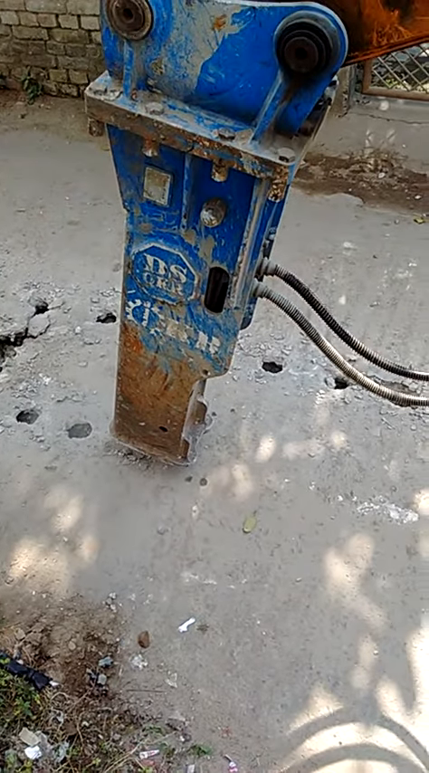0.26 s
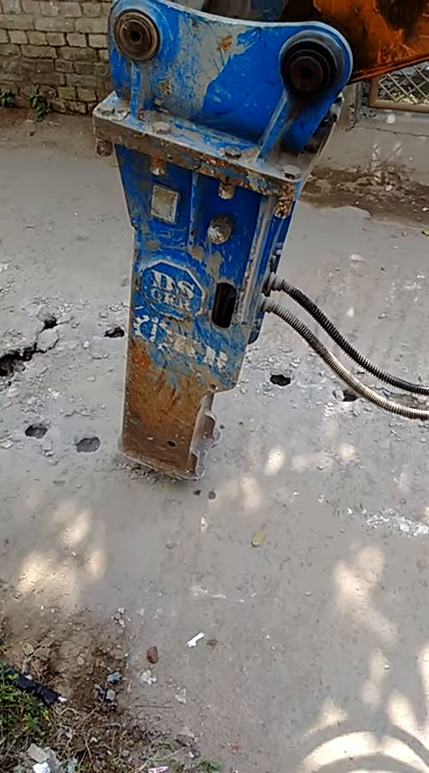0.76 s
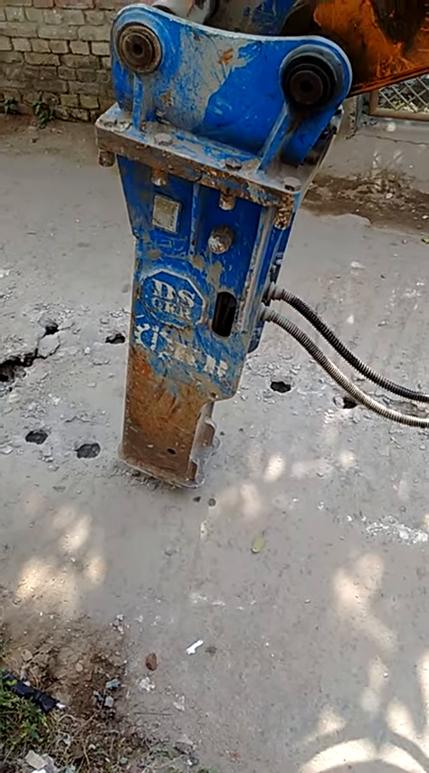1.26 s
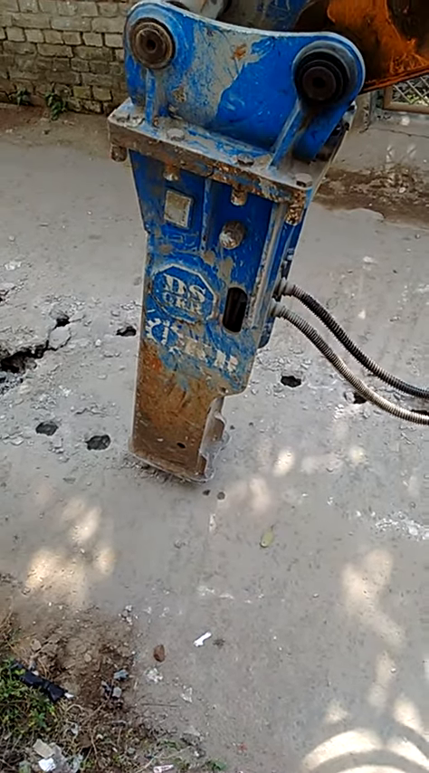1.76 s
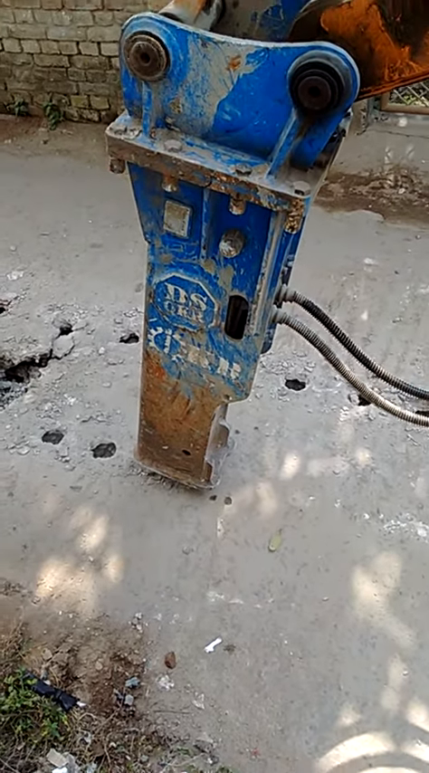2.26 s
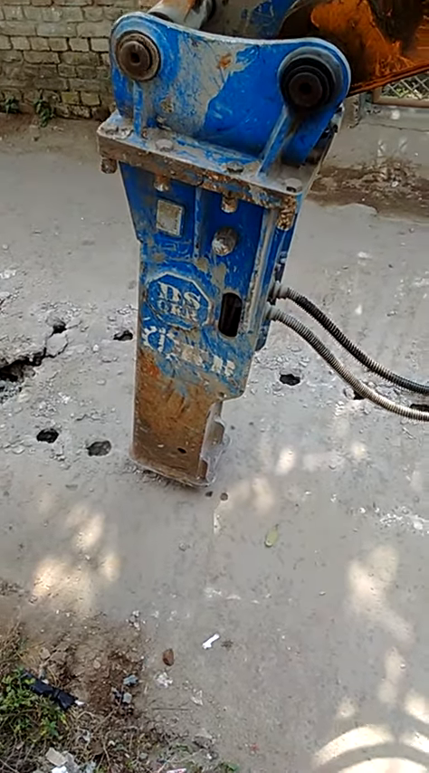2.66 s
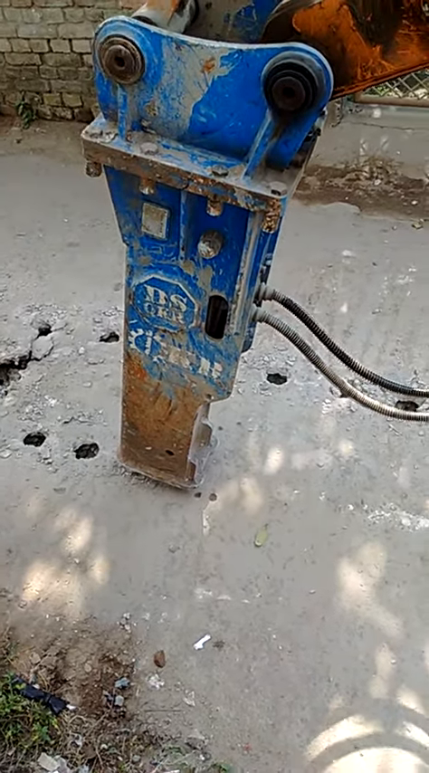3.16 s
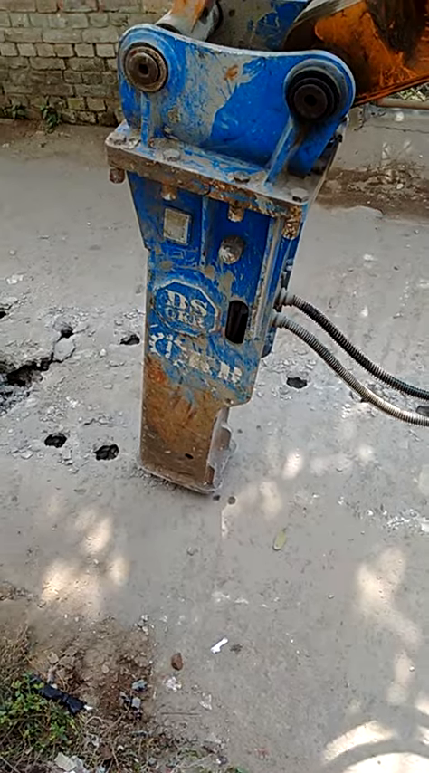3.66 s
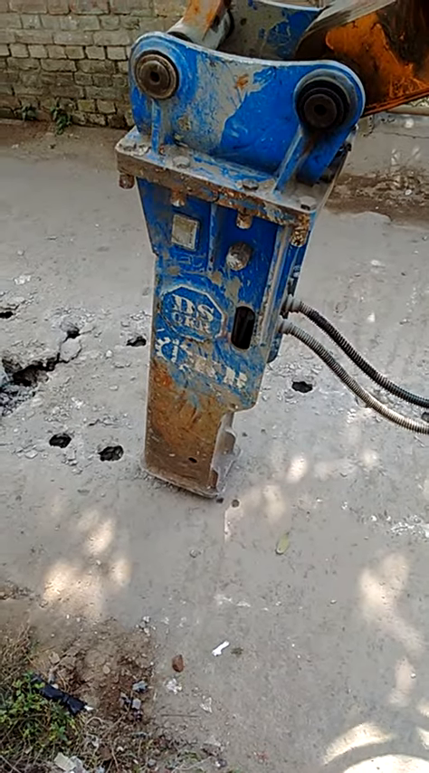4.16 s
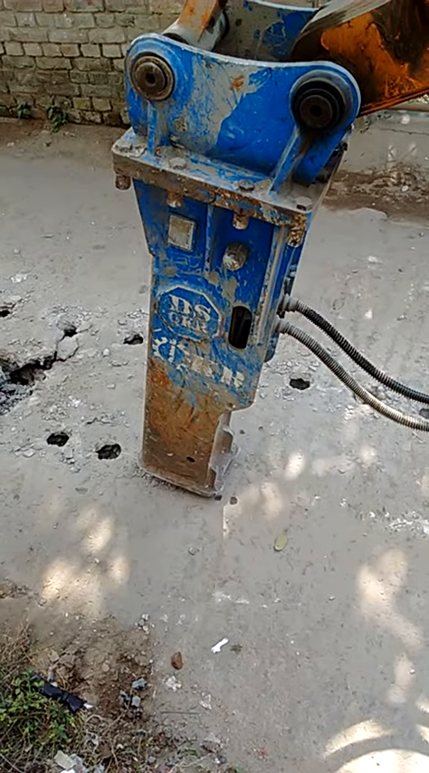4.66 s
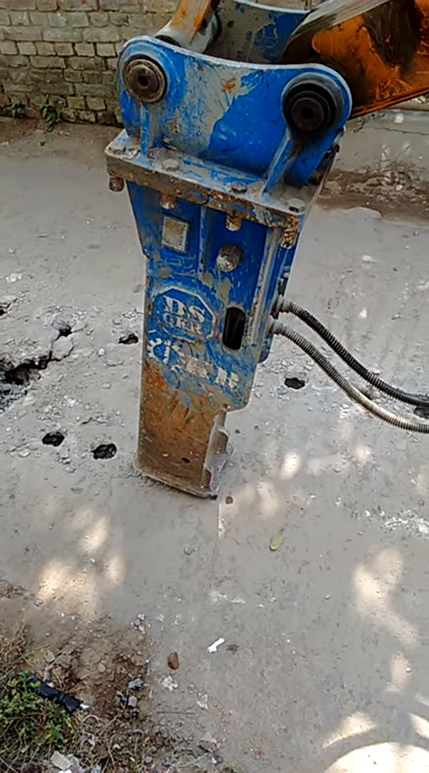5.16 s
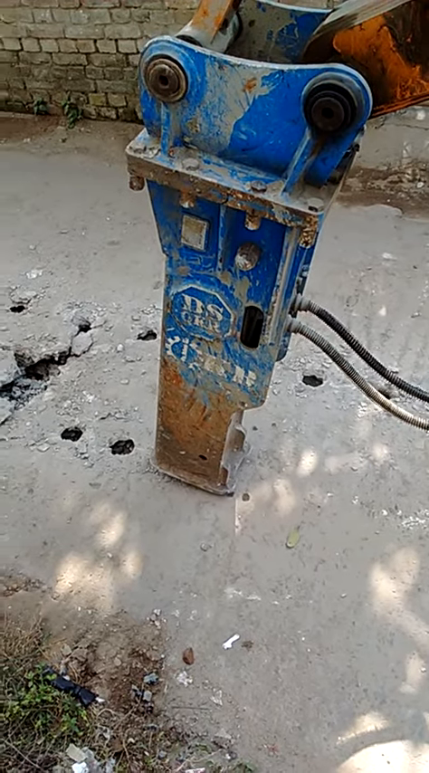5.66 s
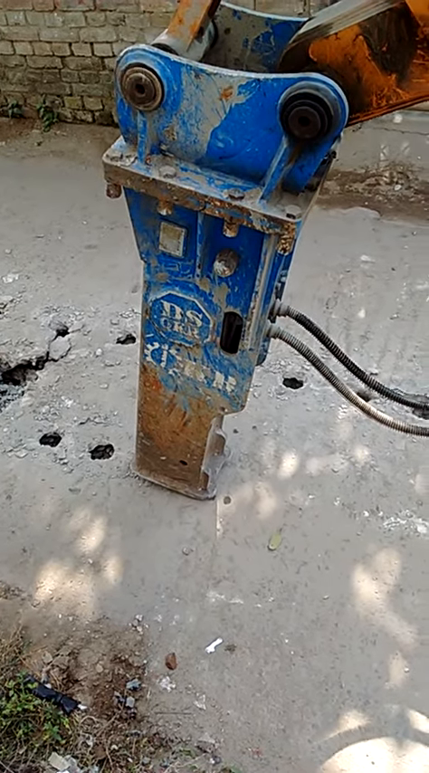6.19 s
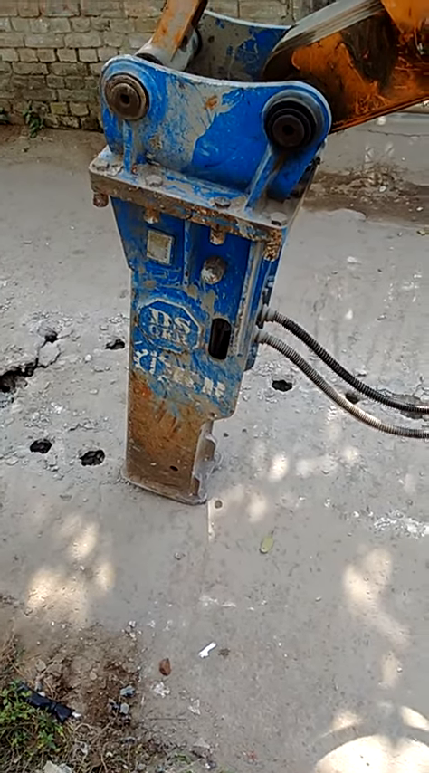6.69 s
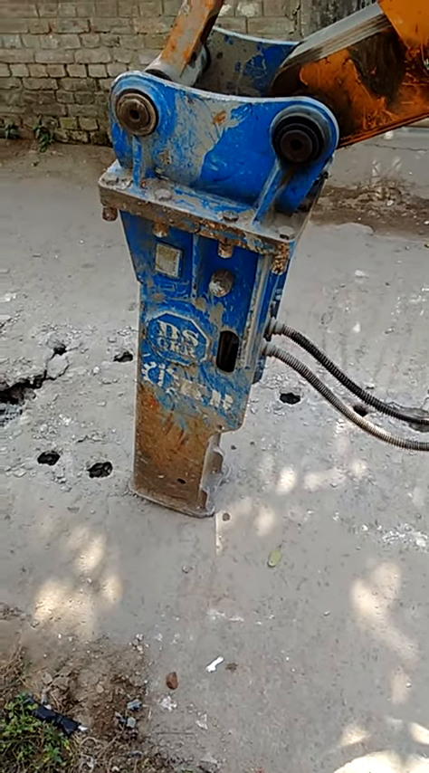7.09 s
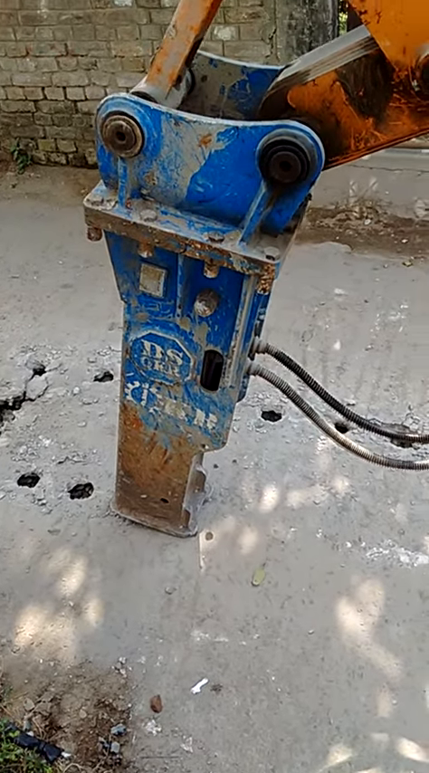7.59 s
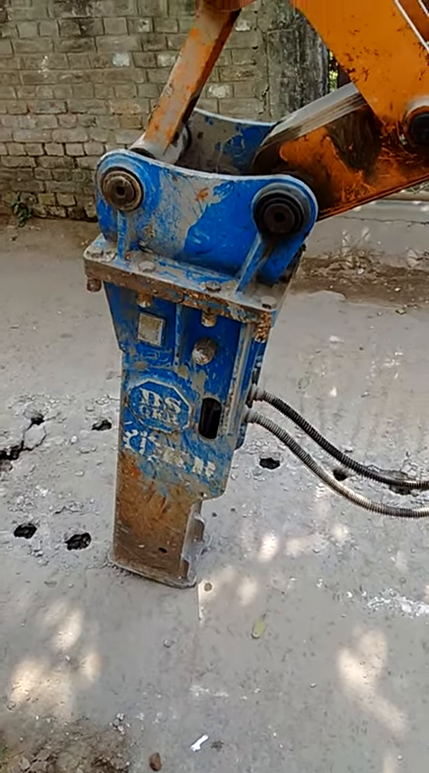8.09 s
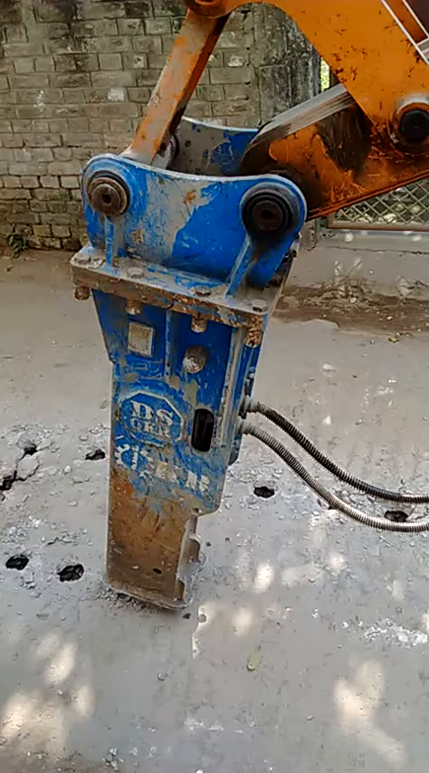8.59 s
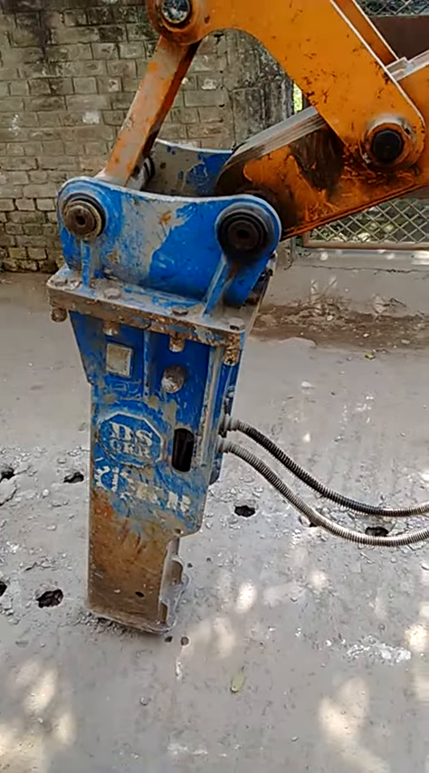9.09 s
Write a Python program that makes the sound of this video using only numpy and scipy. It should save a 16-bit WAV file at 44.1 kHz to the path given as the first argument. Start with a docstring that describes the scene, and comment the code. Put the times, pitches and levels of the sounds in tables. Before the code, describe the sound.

A hydraulic breaker pounds concrete in a rapid, even, ringing metallic hammering, then stops, leaving a diesel engine, whine, clanks and scraping.

```python
"""A hydraulic breaker hammers concrete in a walled lane, seven blows/s: noise bursts plus damped steel modes.
A valve hiss (shaped noise) starts just before each blow; the chisel chatters (clustered contacts) and rings.
After the last blow the diesel (noise and a drone) takes up load, the pump whines and oil squeals (sines),
and the boom shifts the chisel with clanks, crunches and a scrape (softer housing hits and grainy noise)."""
import sys
import numpy as np
from scipy import signal
from scipy.fft import rfft, irfft
from scipy.io import wavfile
from scipy.ndimage import uniform_filter1d

SR = 44100
rng = np.random.default_rng(int(sys.argv[2]) if len(sys.argv) > 2 else 0)


def inscribe(sig):
    """Save sig as 16-bit PCM at rate SR to the path in sys.argv[1].

    A 1-D sig is mono; a 2-D sig holds one channel per row.
    Samples are clipped to [-1, 1] before scaling.
    """
    pcm = np.round(np.clip(np.atleast_2d(sig).T, -1, 1) * 32767)
    wavfile.write(sys.argv[1], SR, pcm.astype(np.int16))


N = 411894
SIZE = 24576  # samples per hit
T = np.arange(SIZE) / SR
HZ = np.fft.rfftfreq(SIZE, 1 / SR)

# chisel seat: t/s, depth in hole/0-1, crumbling of concrete/0-1, housing shake/dB
SEAT = [(0, 0.04, 0.08, -3), (.35, .05, 0.1, 0.5), (1.05, 0.15, 0.47, -1.5), (1.45, 0.22, 0.74, 1.5),
        (2.29, 0.42, 1, 1), (2.72, 0.32, 0.99, 1), (2.86, 0.12, 0.16, 0.5), (3.45, 0.9, 0.22, -0.5),
        (3.8, 0.92, 0.14, -1.5), (4.3, 0.75, 0.14, -2.5), (4.85, 0.83, 0.06, -1.8), (5.14, 0.9, 0, -4.5),
        (5.6, 1, 0.17, 0), (6.15, 0.93, 0, -2.7), (6.45, 0.58, 0.16, -3.5), (7.13, 1, 0, -5)]
# housing and chisel modes: f/Hz, shallow level/dB, deep level/dB, t60/s, left minus right/dB
STEEL_MODES = [(165, -11.5, -19, 0.28, 9.5), (194, -16, -14.5, 0.23, 11), (245.3, -16, -14, 0.36, -6.5),
               (296.8, -15.5, -18.5, 0.22, 22), (343.6, -3.5, -14, 0.092, 17.5), (394.7, -28, -8, 0.54, -4),
               (655.5, -8, -19.5, 0.32, 11), (738, -4, -14, 0.083, 13.5), (839, -12, -21.5, 0.7, -1),
               (929, -8.5, -16.5, 0.31, 10), (1120.5, -12.5, -10, 0.34, 6), (1229, -11, -14.5, 0.12, 21),
               (1468, -30, -13.5, 0.51, 1), (1810, -13.5, -17, 0.45, 0), (1957, -11, -9.5, 0.28, 0),
               (2100, -14, -32, 0.19, -12), (2510, -8, -52, 0.069, 17.5), (3650, -20, -41, 0.43, -7),
               (4620, -34, -26, 0.21, 9), (7950, -35, -44, 0.6, 6), (11370, -35, -42, 0.49, 7)]
# chisel chatter spectrum: f/Hz, relative density/dB per Hz
CHATTER_SPECTRUM = [(100, -67), (500, 11.5), (1100, 12), (2000, 4.5), (2900, -4.5), (4100, 6.5),
                    (5200, -10), (6500, -21), (8100, -5.5), (15000, -31.5)]
# oil hiss spectrum: f/Hz, relative density/dB per Hz
OIL_SPECTRUM = [(300, -30), (1500, -28), (3300, 5), (5500, -3.5), (6800, -4.5), (8200, -4.5), (11000, -11),
                (15000, -24.5)]
# concrete crumbs crunching under the tip: t/s, level/dB
CRUMB_HITS = [(7.525, -54), (7.66, -75), (7.78, -50), (7.821, -47), (7.883, -42), (7.921, -47), (7.98, -46),
              (8.702, -31), (8.729, -30.5)]
# phase between the two microphone ports: f/Hz, left lead/rad
PORT_PHASE_RAD = [(60, -0.5), (130, -4), (260, -5.5), (500, -3.5), (720, -1.5), (850, -1), (1300, -0.55),
                  (1950, 0.35), (2200, 2), (3000, 3), (3700, 3.5), (4100, 8.5), (4600, 7), (5500, 7),
                  (6400, 9.5), (8400, 13), (10200, 18.4), (15200, 32.5)]


def hammer(housing, ring_db=2, crack_db=8, cushion_db=-20, shake_loss=0.23, crack_t60_s=0.06, rise_s=0.0015,
           chatter_s=0.013, linger=1.0, chatter_db=-15, loosen_db=9, thump_db=-4, thump_deep_db=6,
           uneven_db=0.76):
    """Blows excite clang, modes, crack, chatter and thump; the fine pattern drifts, fastest in the treble."""
    # ring between the walls: f/Hz, relative density/dB per Hz
    clang_spectrum = [(25, -95), (60, -5), (130, -3), (330, 4), (480, 1), (900, -2.5), (1400, -1.5),
                      (1900, 3), (2400, -5), (3600, -6.5), (5000, -14), (7000, -17), (8700, -19.5),
                      (15000, -34)]
    # first crack: f/Hz, relative density/dB per Hz
    crack_spectrum = [(40, -39), (120, -7), (300, 2.5), (600, 1.5), (1400, -3), (1900, 11), (2400, 1.5),
                      (4500, -13.5), (15000, -36.5)]
    # rows thud, body, clang, crack, grit: fresh level/dB, full-depth change/dB, crumbling change/dB, shake share
    blow_parts = [(-32.5, -1, 0.5, -0.17), (-20.5, -1, 1, 0.67), (-19.5, 1, 1, 1), (-22, 3, 2.5, -0.28),
                  (-23.5, -0.5, 5.5, 0.063)]
    out, modes, push = np.zeros((2, N)), steel_modes(), thump()
    clang, crack, chatter = colour(clang_spectrum), colour(crack_spectrum), colour(CHATTER_SPECTRUM)
    # f/Hz, share of the pattern kept from blow to blow
    memory = read([(300, 0.885), (900, 0.76), (1900, 0.73), (4500, 0.51), (12000, .25)], HZ)
    renewal = np.sqrt(1 - memory ** 2)
    wall, tip = chance(), chance()
    for s in blow_times():
        wall = memory * wall + renewal * chance()
        tip = memory * tip + renewal * chance()
        depth, crumbling, shake_db = follow(SEAT, s)
        blow = die_away(clang(housing * wall))
        blow += gain_of(ring_db) * ring(modes, wall, depth)
        # a deep chisel shoves the slab harder
        blow += gain_of(thump_db + thump_deep_db * depth) * push
        # rubble and a shaking housing soften the crack
        crack_gain = gain_of(crack_db + cushion_db * crumbling - shake_loss * shake_db)
        blow += crack_gain * crack(housing * tip) * fading(crack_t60_s)
        # in rubble the chisel rattles louder and longer
        rattle = bounces(chatter_s * (1 + linger * crumbling))
        blow += gain_of(chatter_db + loosen_db * crumbling) * chatter(housing * chance()) * rattle
        levels_db = np.dot(blow_parts, [1, depth, crumbling, shake_db])
        levels_db = levels_db + uneven_db * rng.standard_normal(len(blow_parts))
        add(out, s, weigh(blow * np.minimum(T / rise_s, 1), levels_db))
    return out


def blow_times(stroke_s=.1405):
    """The piston strokes evenly, about stroke_s apart, from each change of pace to the next."""
    # blows at which the piston changes pace or stumbles: t/s
    pace_marks = [0.0204, .4488, 1.8699, 2.4252, 2.5662, 2.7159, 2.8617, 3.025, 3.4566, 3.5989, 4.9903,
                  5.1396, 5.302, 5.4508, 5.5955, 7.1295]
    runs = [np.linspace(a, b, round((b - a) / stroke_s), endpoint=False)
            for a, b in zip(pace_marks, pace_marks[1:])]
    return np.concatenate(runs + [pace_marks[-1:]])


def crowded_modes(ripple_db=3.5, from_hz=2700):
    """Countless weak housing modes: one fixed treble ripple, shared by hammer and linkage hits."""
    smooth = uniform_filter1d(uniform_filter1d(rng.standard_normal(len(HZ)), size=26), size=26)
    ripple = evened(np.tanh(evened(smooth)))
    treble = HZ ** 4 / (HZ ** 4 + from_hz ** 4)
    return gain_of(ripple_db * ripple * treble)


def steel_modes():
    """Each steel mode decays exponentially; returns the decays and complex weights at the ports."""
    hz, _, _, t60_s, lean_db = np.transpose(STEEL_MODES)
    left = gain_of(lean_db / 2)
    right = gain_of(-lean_db / 2) * np.exp(-1j * read(PORT_PHASE_RAD, hz))
    return fading(t60_s[:, None]).astype(np.float32), np.array([left, right])


def ring(modes, z, depth, uneven_db=1.5, detune=0.0038):
    """Modes struck together; depth shifts their mix, each contact varies their level and pitch."""
    hz, shallow_db, deep_db, _, _ = np.transpose(STEEL_MODES)
    decays, weights = modes
    push, vary = z[:, np.searchsorted(HZ, hz)]
    level_db = shallow_db + depth * (deep_db - shallow_db) + uneven_db * vary.real
    strike = weights * gain_of(level_db) * push / abs(push)
    angle = np.outer(2 * np.pi * hz * (1 + detune * vary.imag), T).astype(np.float32)
    return strike.real @ (decays * np.cos(angle)) - strike.imag @ (decays * np.sin(angle))


def die_away(x):
    """Wall ring builds up and decays at a pace set by frequency; the midrange builds slowest."""
    # clang decay: f/Hz, t60/s
    clang_decay = [(60, 0.56), (250, 0.39), (700, 0.54), (1900, 0.38), (4500, 0.28), (13000, 0.22)]
    # clang build-up: f/Hz, time constant/s
    clang_build = [(100, 0.0011), (400, 0.0036), (2000, 0.0072), (4000, 0.0041), (9000, 0.0021)]
    hz, t, z = signal.stft(x, SR, nperseg=256)
    fall = gain_of(-60 * t / read(clang_decay, hz)[:, None])
    build = 1 - np.exp(-(t + t[1] / 2) / read(clang_build, hz)[:, None])
    return signal.istft(z * fall * build, SR, nperseg=256)[1][:, :SIZE]


def thump(hz=100, t60_s=0.045, knock_hz=290, knock_t60_s=0.014, knock_db=1, right_share=0.61):
    """Slab and housing shoved once: a low push and a compact knock, inverted on the right."""
    push = np.cos(2 * np.pi * hz * T) * fading(t60_s)
    push += gain_of(knock_db) * np.cos(2 * np.pi * knock_hz * T) * fading(knock_t60_s)
    return np.array([push, -right_share * push])


def bounces(span_s, per_s=300, grain_s=0.0087, size_db=4):
    """Envelope of many small contacts in the hole that swell and die just after the impact."""
    contacts = (rng.random(SIZE) < per_s / SR) * gain_of(size_db * rng.standard_normal(SIZE))
    power = signal.lfilter([1], [1, -np.exp(-1 / (grain_s * SR))], contacts ** 2)
    return evened(np.sqrt(power)) * T / span_s * np.exp(1 - T / span_s)


def weigh(x, levels_db):
    """Sets the power of each band of a hit over its first tenth of a second."""
    # band edges, of which the inner four split the spectrum: f/Hz
    band_edges = [30, 170, 500, 1400, 2400, 15500]
    splits_hz = band_edges[1:-1]
    count = SR // 10
    power = 2 * (abs(rfft(x[:, :count])) ** 2).mean(0) / count ** 2
    band = np.digitize(np.fft.rfftfreq(count, 1 / SR), splits_hz)
    change_db = np.asarray(levels_db) - 10 * np.log10(np.bincount(band, power) + 1e-20)
    smooth_db = uniform_filter1d(change_db[np.digitize(HZ, splits_hz)], size=70)
    fade_out = np.minimum(10 * (1 - T / T[-1]), 1)
    return irfft(rfft(x) * gain_of(smooth_db)) * fade_out


def chisel(bend_hz=587.5, high_hz=9777, high_db=-45, tink_db=-11):
    """The steel rod keeps a low bending note and a thin high one, which crumbs also set off."""
    # drive of the bending note: t/s, level/dB
    bending = [(0, -42), (1.7, -35), (2.1, -25), (3.2, -33), (3.75, -24), (4.75, -37.5), (5.15, -34),
               (5.75, -31), (7.13, -38)]
    # rod dropping against its bush: t/s, level/dB
    last_note = [(8.757, -32)]
    bends = [(s, follow(bending, s)[0]) for s in blow_times()] + last_note
    tinks = [(s, high_db) for s in blow_times()] + [(s, db + tink_db) for s, db in CRUMB_HITS]
    low = long_note(bend_hz, bends, t60_s=1.0, rise_s=0.011, lean_db=5, lag_rad=0.4, uneven_db=2.7)
    high = long_note(high_hz, tinks, t60_s=.55, rise_s=.01, lean_db=2.5, lag_rad=4.3, uneven_db=2.5)
    return low + high


def long_note(hz, strikes, t60_s, rise_s, lean_db, lag_rad, uneven_db, slip_rad=0.31):
    """A mode that outlasts the gap between strikes; each tops it up, slightly out of phase."""
    level = np.zeros((1, N), complex)
    shape = fading(t60_s) * np.minimum(T / rise_s, 1)
    for s, db in strikes:
        size, step = rng.standard_normal(2)
        add(level, s, gain_of(db + uneven_db * size) * np.exp(1j * slip_rad * step) * shape[None])
    angle = 2 * np.pi * hz * np.arange(N) / SR
    note = (level * np.exp(1j * np.array([angle, angle - lag_rad]))).imag  # the right port lags
    return note * gain_of([[lean_db / 2], [-lean_db / 2]])


def valve(lead_s=.0252, rise_s=0.0036, hiss_db=-31, t60_s=0.55, uneven_db=3, shallow_db=2):
    """Oil rushes through the valve as the piston starts down, louder while the chisel is shallow."""
    out, hiss = np.zeros((2, N)), colour(OIL_SPECTRUM)
    shape = np.minimum(T / rise_s, 1) * fading(t60_s)
    for s in blow_times():
        depth = follow(SEAT, s)[0]
        level_db = hiss_db + shallow_db * (1 - depth) + uneven_db * rng.standard_normal()
        add(out, s - lead_s, gain_of(level_db) * shape * hiss(chance()))
    return out


def linkage(housing, ring_db=3, rise_s=0.0019, grit_db=-6, grit_s=0.016, clank_body_db=-6,
            clank_crack_db=-4.5, scrape_crack_db=-3):
    """Slack pins and the dragged chisel knock the same housing, with grit grinding under the tip."""
    # linkage and chisel knocks: t/s, thud/dB, clank/dB, grit/dB
    knocks = [(7.67, -38, -26.5, -44.5), (7.813, -35.5, -48, -46), (8.253, -44, -27.5, -33.5),
              (8.308, -32, -23, -31.5), (8.334, -36, -28, -29), (8.522, -29, -35, -41),
              (8.556, -30, -25.5, -35.5), (8.582, -51, -23.5, -25), (8.605, -52, -30, -22.5),
              (8.63, -50, -36, -24.5), (8.756, -59, -27, -39)]
    # clank spectrum: f/Hz, relative density/dB per Hz
    clank_spectrum = [(30, -32), (80, -3), (135, 5.5), (210, 6.5), (330, -8), (600, -3.5), (1100, -3),
                      (1900, 1), (2600, -4), (4200, -10.5), (6500, -18), (15000, -37)]
    out, modes = np.zeros((2, N)), steel_modes()
    clang, chatter = colour(clank_spectrum), colour(CHATTER_SPECTRUM)
    for s, thud_db, clank_db, scrape_db in knocks:
        z = chance()
        grinding = bounces(grit_s, per_s=570, grain_s=0.0019, size_db=5.5)
        knock = die_away(clang(housing * z))
        knock += gain_of(ring_db) * ring(modes, z, depth=0.71)
        knock += gain_of(grit_db) * chatter(housing * chance()) * grinding
        body_db = together(thud_db, clank_db + clank_body_db)
        crack_db = together(clank_db + clank_crack_db, scrape_db + scrape_crack_db)
        levels_db = [thud_db, body_db, clank_db, crack_db, scrape_db]
        add(out, s, weigh(knock * np.minimum(T / rise_s, 1), levels_db))
    return out


def crumbs(t60_s=0.22, rise_s=0.0056, grain_db=2.0):
    """Concrete crumbs crunch: short decaying noise with a random grainy envelope."""
    # crunch spectrum: f/Hz, relative density/dB per Hz
    crunch_spectrum = [(500, -23), (2500, -7), (5000, -4), (9000, 0), (15000, -17)]
    out, crunch = np.zeros((2, N)), colour(crunch_spectrum)
    shape = np.minimum(T / rise_s, 1) * fading(t60_s)
    for s, db in CRUMB_HITS:
        roughness = evened(uniform_filter1d(rng.standard_normal(SIZE), size=60))
        grains = evened(gain_of(grain_db * roughness))
        add(out, s, gain_of(db) * crunch(chance()) * grains * shape)
    return out


def squeal(waver=0.0018, flutter_db=4.0, swell_db_per_s=110, fade_db_per_s=50):
    """Oil squeals through a half-open spool: wavering sines that swell quickly and fade slowly."""
    # oil squeals: t of peak/s, f/Hz, level/dB
    squeals = [(7.84, 3601, -55), (8.0, 3601, -44.5), (8.96, 3630, -52), (9.03, 4150, -52)]
    t, out = np.arange(N) / SR, np.zeros((2, N))
    drift, flutter = (evened(uniform_filter1d(z, size=1200)) for z in rng.standard_normal((2, N)))
    for s, hz, db in squeals:
        slope_db = np.maximum(swell_db_per_s * (s - t), fade_db_per_s * (t - s))
        level_db = db - slope_db + flutter_db * flutter
        angle = 2 * np.pi * np.cumsum(hz * (1 + waver * drift)) / SR
        out += gain_of(level_db) * np.sin(angle - np.array([[0], [1.]]))
    return out


def excavator(firing_hz=127.5, clatter_hz=30.22, clatter=0.19, drone_db=-8, waver=0.0119, pump_waver=0.002,
              hiss_db=-44, hiss_growth=1.8, pump_start_s=7.69, pump_rise_s=0.034, pump_db=-34,
              pump_fade_db_per_s=22):
    """Diesel drones and clatters; oil hisses with the load; pump whine swells as the boom starts, then fades."""
    # diesel load: t/s, level/dB
    load = [(0, -33), (7.2, -40), (7.66, -34.5), (7.76, -31), (8.1, -31.5), (8.5, -28), (8.92, -33),
            (9.34, -29)]
    # diesel spectrum: f/Hz, relative density/dB per Hz
    diesel_spectrum = [(25, -42), (70, -16), (125, -3), (220, -2), (350, -3.5), (500, -3), (1100, -8),
                       (1500, -7.5), (1950, -6.5), (2500, -13), (3900, -22.5), (4800, -36), (10000, -61),
                       (13000, -60)]
    # pump whine partials: f/Hz, relative level/dB
    pump_partials = [(312.2, 2.5), (834, -16)]
    t, hz = np.arange(N) / SR, np.fft.rfftfreq(N, 1 / SR)
    diesel_db, = follow(load, t)
    oil_db = hiss_db + hiss_growth * (diesel_db - diesel_db.max())
    since_s = np.maximum(t - pump_start_s, 0)
    pump = np.minimum(since_s / pump_rise_s, 1) * gain_of(pump_db - pump_fade_db_per_s * since_s)
    # shared speed wander
    wander = evened(uniform_filter1d(uniform_filter1d(rng.standard_normal(N), size=2500), size=2500))
    drift_s = np.cumsum(wander) / SR
    engine_s = t + waver * drift_s
    pump_s = t + pump_waver * drift_s
    beat = 1 + clatter * np.cos(2 * np.pi * clatter_hz * engine_s)
    drone = np.sqrt(2) * np.sin(2 * np.pi * firing_hz * engine_s + np.array([[0], [1.]]))
    diesel = colour(diesel_spectrum, hz)(chance(N)) * beat + gain_of(drone_db) * drone
    oil = colour(OIL_SPECTRUM, hz)(chance(N))
    whine = sum(gain_of(db) * np.sqrt(2) * np.sin(2 * np.pi * f * pump_s) for f, db in pump_partials)
    machine = gain_of(diesel_db) * diesel + gain_of(oil_db) * oil + pump * whine
    return machine * gain_of([[-1.2], [1.2]])  # stands to the right


def chance(size=SIZE):
    """Two unrelated white spectra."""
    shape = (2, size // 2 + 1)
    return rng.standard_normal(shape) + 1j * rng.standard_normal(shape)


def ports(hz):
    """Likeness, delay and shading at two microphone ports mix two unrelated spectra."""
    # likeness of the ports: f/Hz, likeness/0-1
    port_likeness = [(60, 0.77), (180, 0.034), (400, 0.35), (650, 0.54), (1500, 0.84), (3200, 0.74),
                     (3900, 0.56), (4700, 0.8), (9500, 1), (12000, 0.19), (15000, 0.23)]
    # balance of the ports: f/Hz, left minus right/dB
    port_balance = [(60, 1.1), (250, 1), (400, 0.56), (600, 1.04), (1100, 4.5), (1900, 0.7), (2600, 4.2),
                    (3800, 2.3), (5000, 6), (7500, 0.78), (9500, 0.92), (12000, 9.7), (15000, 13)]
    same = np.clip(read(port_likeness, hz), 0, .98)
    other = np.sqrt(1 - same ** 2)
    lean = gain_of(read(port_balance, hz) / 2)
    right = np.exp(-1j * read(PORT_PHASE_RAD, hz)) / lean
    return lambda z: np.array([z[0] * lean, (same * z[0] + other * z[1]) * right])


def colour(spectrum, hz=HZ):
    """A filter from white spectra to stereo noise of the given colour, at rms 1."""
    gain, pair = gain_of(read(spectrum, hz)), ports(hz)
    return lambda z: evened(irfft(pair(z) * gain))


def fading(t60_s):
    """An envelope that falls 60 dB in t60_s."""
    return gain_of(-60 * T / t60_s)


def gain_of(db):
    """Decibels to a factor."""
    return 10 ** (np.asarray(db) / 20)


def together(a_db, b_db):
    """Level of two unrelated sounds heard at once, in dB."""
    return 20 * np.log10(np.hypot(gain_of(a_db), gain_of(b_db)))


def evened(x):
    """Scales to rms 1."""
    return x / np.sqrt(np.mean(x ** 2) + 1e-20)


def read(points, hz):
    """Reads a table on a log-frequency axis."""
    f, value = np.transpose(points)
    return np.interp(np.log(hz + 1), np.log(f + 1), value)


def follow(rows, s):
    """Reads every column of a curve at the times s."""
    times, *columns = np.transpose(rows)
    return [np.interp(s, times, c) for c in columns]


def add(mix, s, sound):
    """Adds a sound at the time s, cut to fit the mix."""
    start = round(s * SR)
    sound = sound[:, max(-start, 0):]
    part = mix[:, max(start, 0):][:, :sound.shape[1]]
    part += sound[:, :part.shape[1]]


def scene():
    """Sums the hammer and chisel, the boom's noises and the excavator."""
    housing = crowded_modes()
    breaker = hammer(housing) + chisel() + valve()
    boom = linkage(housing) + crumbs() + squeal()
    return breaker + boom + excavator()


def record(dry, knee=0.12, edge_hz=15600):
    """Peaks above the knee are rounded off by tanh; then a low-pass sets the band limit."""
    over = np.maximum(abs(dry) - knee, 0)
    held = np.sign(dry) * (np.minimum(abs(dry), knee) + (1 - knee) * np.tanh(over / (1 - knee)))
    lowpass = signal.firwin(511, edge_hz, window=("kaiser", 9), fs=SR)
    return signal.oaconvolve(held, lowpass[None], "same")


dry = scene()
out = record(dry)
inscribe(out)
```